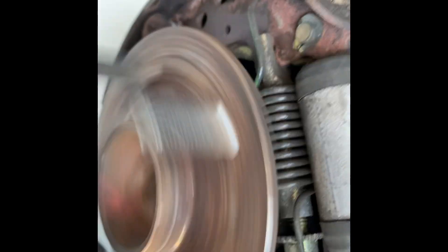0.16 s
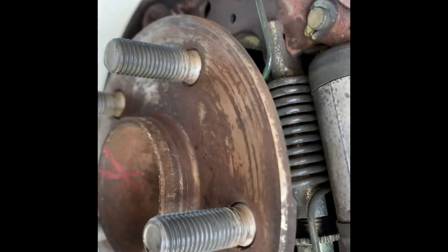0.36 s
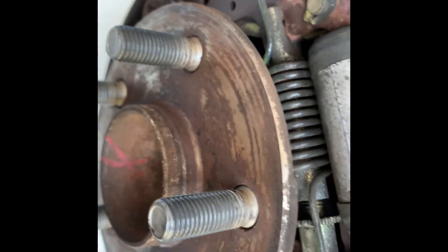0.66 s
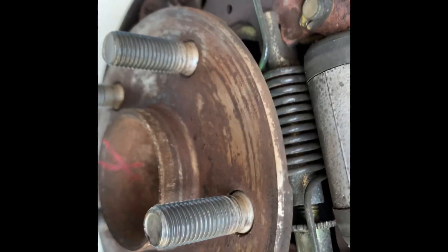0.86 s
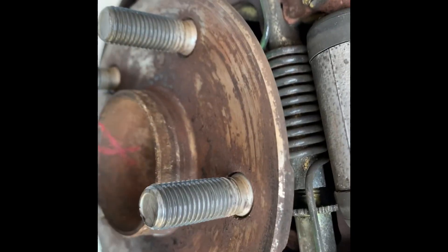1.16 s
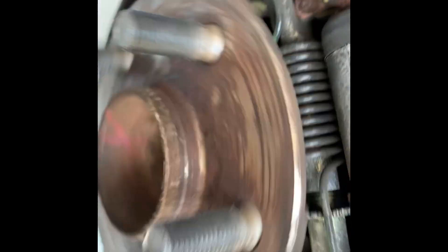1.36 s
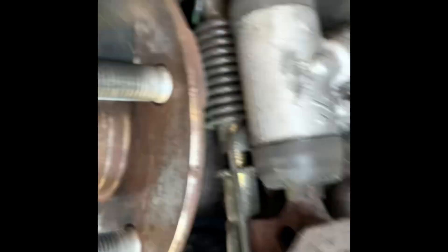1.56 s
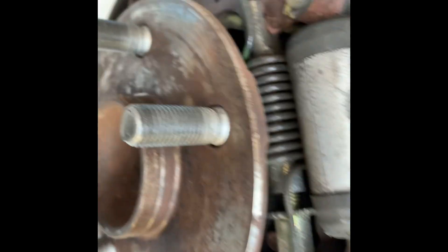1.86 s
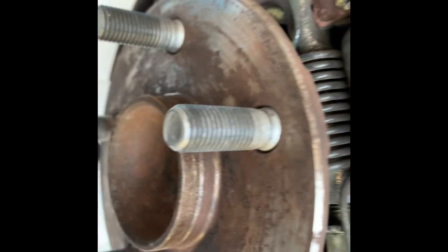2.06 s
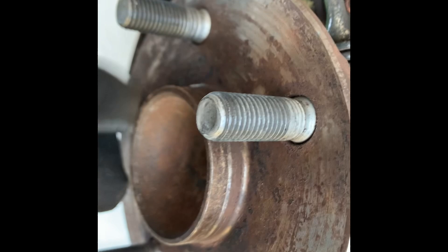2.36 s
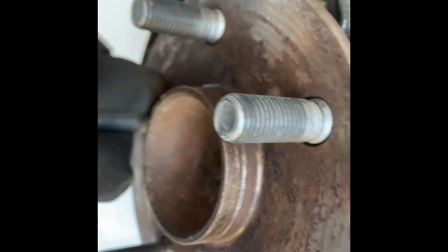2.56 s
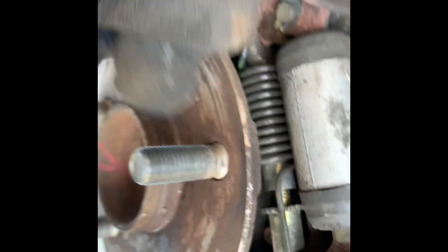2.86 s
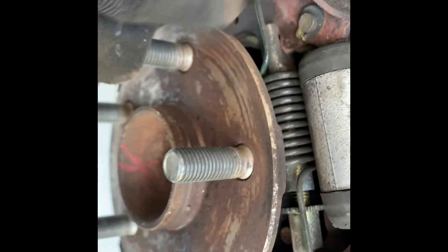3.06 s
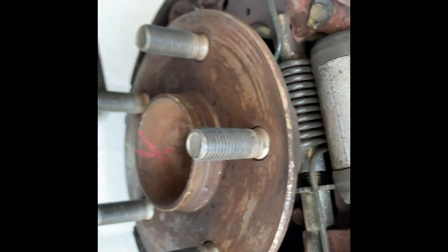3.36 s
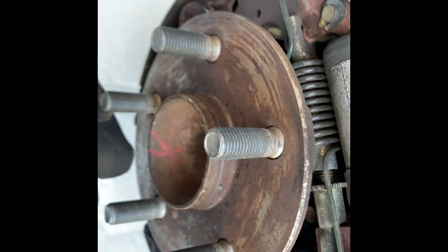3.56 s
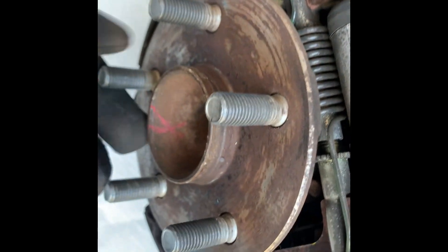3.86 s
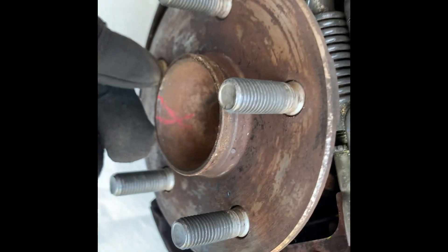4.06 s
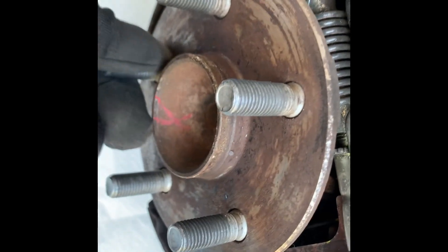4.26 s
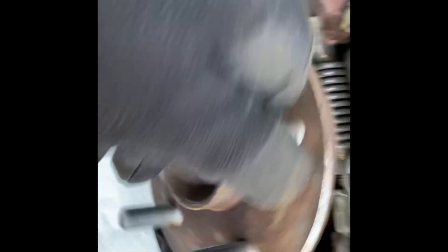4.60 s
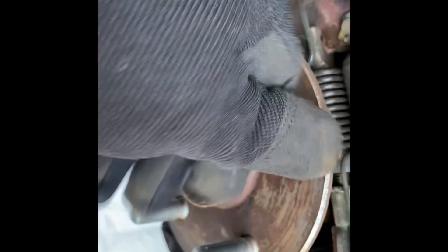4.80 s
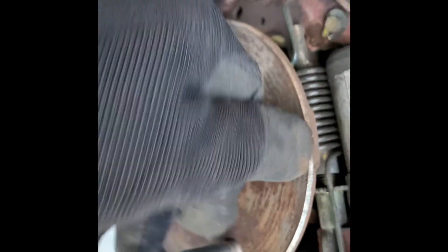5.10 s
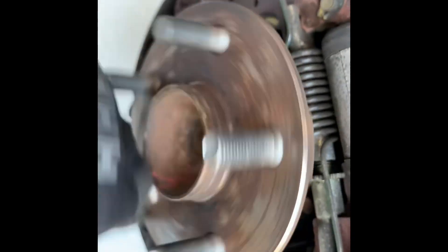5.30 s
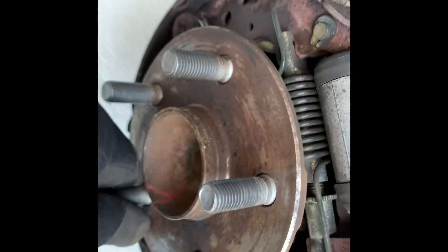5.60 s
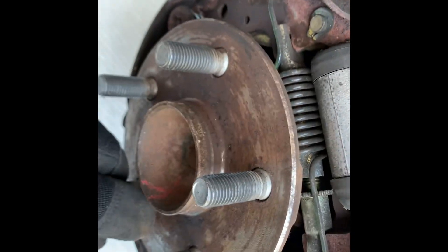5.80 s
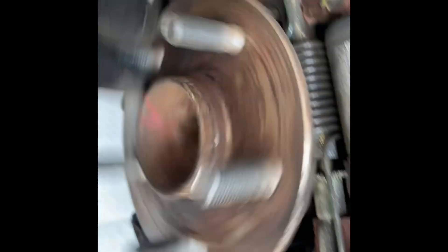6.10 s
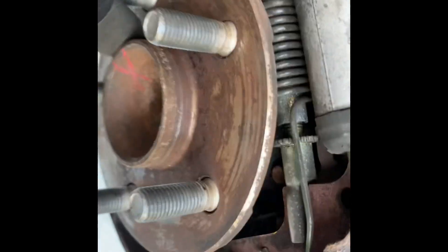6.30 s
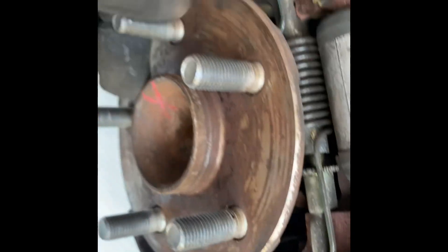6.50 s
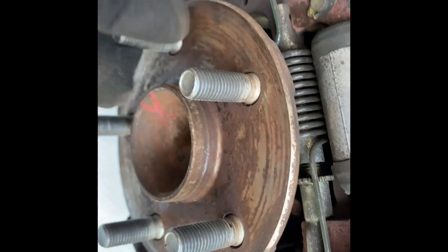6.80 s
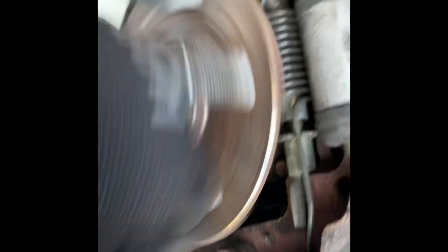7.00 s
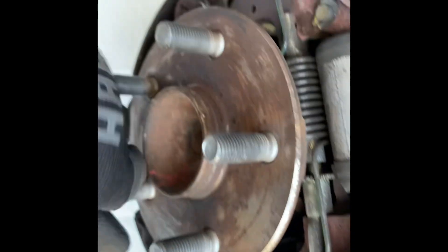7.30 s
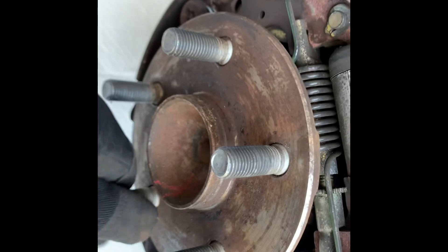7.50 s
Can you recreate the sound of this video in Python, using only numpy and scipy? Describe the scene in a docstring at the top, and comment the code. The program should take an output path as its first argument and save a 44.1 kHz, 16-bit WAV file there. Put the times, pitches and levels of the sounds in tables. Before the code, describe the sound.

Outdoors, distant traffic makes a low rumble that fades slightly across the whole stretch, while two far engines drone, swelling and dipping. Close to the microphone, a gloved hand flicks a rusty car wheel hub six times, at about 0.1, 1.4, 2.7, 4.5, 5.2 and 7 seconds. Each flick gives a very short, gritty metallic grating from the dry bearing and the hub's rim. Around the flicks the glove rustles and fingertips tick sharply on the metal studs, which ring faintly; the clearest ticks fall near 0.2, 1.4, 5.2, 6.1 and 7 seconds. In the background a bird gives short, hoarse, high chirps roughly once a second, from 0.4 to about 6.5 seconds. From about 4.2 to 6 seconds another bird sings nine quick, evenly spaced falling whistles. After the last flick, a faint glove rustle and the traffic remain.

```python
"""Outdoors, far traffic rumbles from the start and slowly fades, while two engines drone.
Almost at once, close by, a glove rustles, fingertips tick on metal studs, and the hand gives a rusty
wheel hub the first of six flicks. Each time, rust in the dry bearing makes the hub and its flange
(the flat rim) grate. Soon a bird starts to chirp now and then, with two voices at once. From about
4 to 6 seconds another bird sings nine falling whistles. The last flick comes at 7 seconds."""
import sys
import numpy as np
from scipy import signal
from scipy.fft import rfft, irfft, next_fast_len
from scipy.io import wavfile
from scipy.ndimage import uniform_filter1d

SR = 44100
rng = np.random.default_rng(int(sys.argv[2]) if len(sys.argv) > 2 else 0)


def generate_wav(signal):
    """Clip the signal to [-1, 1] and save it as 16-bit WAV at the path in sys.argv[1]."""
    frames = np.transpose(np.atleast_2d(signal))
    scaled = np.clip(frames, -1, 1) * 32767
    pcm = np.round(scaled).astype(np.int16)
    wavfile.write(sys.argv[1], SR, pcm)


N = 337365
PADDED = next_fast_len(N)
T = np.arange(N) / SR
HZ = np.fft.rfftfreq(PADDED, 1 / SR)
TREBLE = 1 / (1 + (9500 / (HZ + 1)) ** 8)  # a filter that keeps what lies above 9500 Hz

# Traffic moving away. Each row: time in seconds, level of the rumble in dB.
RUMBLE_LEVELS = [(0, -32), (2.6, -34), (2.9, -35), (7.65, -37.5)]
# The tone of the rumble and of the tyre roar. Each row: frequency in Hz, strength in dB.
RUMBLE_TONE = [(12, -57), (20, -34), (30, -21.5), (69, 0.5), (86, -1), (108, -6), (143, -6.5), (163, -8.5),
               (209, -11.5), (340, -35.5), (440, -80), (750, -120)]
ROAR_TONE = [(330, -4.5), (430, 1.5), (700, -5.5), (1000, -4.5), (1700, -9), (2400, -15), (3500, -26),
             (5000, -33.5), (7000, -48.5), (15500, -50.5)]
# How the two far engines swell and fade. Each row: time in seconds, level in dB.
LOW_ENGINE_LEVELS = [(0, -34), (0.45, -29), (1.3, -40.5), (2.15, -41.5), (2.32, -32.5), (3.2, -38),
                     (3.5, -48.5), (4.9, -53), (5.09, -36), (5.25, -52.5), (7.65, -42)]
HIGH_ENGINE_LEVELS = [(0, -42), (1.85, -42), (2.0, -32.5), (2.5, -45.5), (3.3, -40.5), (4.2, -37.5),
                      (5.1, -49.5), (5.55, -37.5), (5.75, -74), (5.9, -46.5), (6.9, -45.5), (7.1, -41.5),
                      (7.65, -37.5)]
# The glove sliding on rust and on itself. Each row: middle in seconds, length in seconds, level in dB,
# boost above 9500 Hz in dB. Here and below, a negative boost is a cut.
GLOVE_STROKES = [(0.142, 0.13, -51, 2.5), (0.48, 0.25, -67.5, 1), (1.083, 0.12, -52, -4),
                 (1.229, 0.077, -59.5, -7), (1.376, 0.19, -58, 2), (1.494, 0.089, -50.5, 9),
                 (1.582, 0.086, -57, 9.5), (1.66, 0.082, -57.5, 1), (1.96, 0.087, -67, -10),
                 (2.075, 0.061, -59, -1), (2.33, 0.067, -68.5, 5), (2.49, 0.1, -71, -8),
                 (2.71, 0.06, -50, 7), (2.785, 0.09, -55.5, 9), (2.93, 0.13, -62, 2.5),
                 (3.14, 0.068, -71, -2), (3.33, 0.17, -65, 0.5), (3.623, 0.42, -78, -4),
                 (3.96, 0.78, -74, -9), (4.162, 0.093, -70, -8), (4.514, 0.25, -67, -15),
                 (4.798, 0.09, -72, -1), (5.102, 0.089, -64.5, -3.5), (5.258, 0.15, -57.5, 1.5),
                 (5.714, 0.077, -59, -14), (6.258, 0.063, -74, -5), (6.042, 0.32, -64, -18),
                 (6.366, 0.085, -59, 4), (6.84, 0.098, -72, 7), (7.003, 0.18, -59.5, 3),
                 (7.242, 0.094, -69, -7), (7.625, 0.16, -64.5, -12)]
# The tone of the cloth. Each row: frequency in Hz, strength in dB.
CLOTH_TONE = [(1500, -6), (3000, 13.5), (5000, 11.5), (7500, -3.5), (10000, -10), (13000, -17),
              (15500, -12.5)]
# Fingertips meeting a stud or the flange. Each row: start in seconds, level in dB, boost below 4000 Hz
# in dB, boost above 9500 Hz in dB, ringing in dB compared with the level.
FINGER_TICKS = [(0.088, -38, -1, -6, -33), (0.165, -28, -11, -16, -43), (0.1999, -29, 0.5, -4, -23),
                (0.461, -50, -3, -10, -40), (0.934, -61, 0, 8, -38), (.9916, -60, -3, 6, -13),
                (1.2037, -54, 0, 12, -25), (1.3144, -51, 3, 0, -34), (1.415, -25, -11, 3, -47),
                (1.675, -44, -6, -6, -37), (1.9215, -66, 0, -3, 0), (1.994, -58, 0, 4, -37),
                (2.036, -64.5, 0, -3, -2.5), (2.0616, -46, 7, 13, -41), (2.574, -45.5, 4, 12, -38),
                (2.6209, -46, 0, -10, -30), (2.82, -54, 0, -5, -10), (2.8998, -43, -3, 2, -22),
                (3.148, -45, 14.5, 8, -23.5), (3.955, -51.5, 0, -1, -33), (4.403, -45.5, 0, 11.5, -44),
                (4.541, -43, -5, -27, -42), (5.1945, -31, -13, -16, -25), (5.244, -29, -15, -5, -41),
                (5.968, -49.5, 0, 6, -37), (6.0602, -32.5, -8, -9, -43), (6.136, -30, -0.5, -26, -49),
                (6.6, -51.5, 0, 2, -32), (6.825, -52, 0, 16.5, -30), (6.9037, -43, -1, -18, -37),
                (6.9631, -28.5, 1, -2, -37), (7.013, -27, -28, -10, -36)]
# The notes a stud rings with. Each row: pitch in Hz, level in dB, seconds to fade by 60 dB.
STUD_NOTES = [(6486, 3.5, 0.36), (3390, 0, 0.3), (7700, 1, 0.22), (11090, -12, 0.12)]
# The notes the hub and flange ring with. Each row: pitch in Hz, width in Hz, level in dB.
HUB_NOTES = [(312, 10, -1), (504, 85, -4), (610, 65, -1), (787, 80, -2), (967, 30, 6.5), (1090, 85, -4),
             (1240, 65, -2.5), (1392, 75, -2), (1530, 100, -3), (1715, 80, -6), (2510, 80, -5),
             (2920, 65, -3.5), (3410, 95, -4.5), (3920, 120, -6.5), (4800, 220, -12), (5660, 50, -14),
             (6520, 80, -11), (6770, 60, -12), (7400, 170, -11), (8050, 70, -14), (9660, 94, -22),
             (10900, 80, -25)]
# Flicks of the hub. Each row: middle in seconds, length in seconds, level in dB, boost above 2000 Hz in
# dB, boost below 800 Hz in dB, delay of that low part in seconds, boost of the flange note in dB.
FLICKS = [(0.147, 0.12, -38.5, -1, 4, 0.0059, 2), (1.445, 0.11, -38, -4, 6.5, 0.035, -5.5),
          (2.688, 0.12, -36.5, -2.5, 0.5, 0.0088, -2), (4.518, 0.091, -37.5, -6.5, -1, .005, -1),
          (5.231, 0.11, -37, -5.5, 0, .005, 3), (6.991, 0.13, -34, -6, 1.5, 0.0042, -3)]
# The first bird's chirps. Each row: start in seconds, length in seconds, top pitch in Hz, lower voice's
# pitch as a share of the upper's, level in dB, boost of the lower voice in dB, level of the rasp in dB.
BIRD_CHIRPS = [(0.384, 0.074, 4100, 0.81, -44.5, -6, -62), (1.266, 0.058, 4060, 0.85, -41.5, -10, -61),
               (2.191, 0.076, 3950, 0.85, -48, -6, -64), (2.947, 0.056, 4050, 0.86, -49, -2.5, -60),
               (3.818, 0.056, 4150, 0.94, -43.5, 3, -58.5), (4.653, 0.049, 4020, .87, -43, -2, -66),
               (5.745, 0.056, 3880, 0.88, -42.5, -6, -58), (6.4, 0.078, 3900, 0.91, -42.5, -4.5, -58.5)]
# The course of one chirp. Each row: share of its length, share of its top pitch, boost of the upper
# voice in dB, boost of the lower voice in dB.
CHIRP_SHAPE = [(0, .83, -11, -18), (.2, .93, -4, -7), (.4, 1, 0, -1), (.66, .975, -1, 0),
               (.83, .94, -6, -2), (1, .89, -20, -10)]
# The second bird's whistles. Each row: time of the rough middle in seconds, level in dB.
BIRD_WHISTLES = [(4.25, -43), (4.463, -40.5), (4.676, -39), (4.887, -39), (5.097, -38.5), (5.299, -37),
                 (5.505, -38), (5.711, -39), (5.911, -38.5)]
# How alike the two microphones hear a sound. Each row: frequency in Hz, likeness from 0 to 1.
STEREO_LIKENESS = [(60, 1), (250, 0.89), (400, 0.7), (700, 0.072), (1600, 0.47), (2600, 1), (3700, 0.16),
                   (4500, 1), (16000, 1)]
# How much louder the left microphone is. Each row: frequency in Hz, left minus right in dB.
LEFT_LEAN = [(60, 2.6), (200, 4), (430, 5.8), (800, 2), (1300, .3), (16000, 0)]
# How far the wave on the right runs ahead. Each row: frequency in Hz, lead in radians.
RIGHT_LEAD = [(0, 0), (250, 0), (750, 1.3), (1800, 0), (2600, -1.6), (3600, -1.8), (4650, -np.pi)]


def undb(db):
    """Turn decibels into a number to multiply by."""
    return 10 ** (np.asarray(db) / 20)


def unit(x):
    """Scale a sound to an average power of 1."""
    return x / np.sqrt(np.mean(x ** 2))


def on_log_hz(table):
    """Join rows of (Hz, value) into a curve over all frequencies, giving each octave equal room."""
    hz, value = np.transpose(table)
    return np.interp(np.log(HZ + 1), np.log(hz), value)


def colour(x, gain):
    """Filter a sound: multiply each frequency by its own gain."""
    return irfft(rfft(x, PADDED) * gain, PADDED)[:N]


def walk(per_s):
    """A smooth random wobble of about 1 either way, with per_s new values a second."""
    hold = int(SR / per_s)
    steps = np.repeat(rng.standard_normal(N // hold + 1), hold)
    return 1.32 * uniform_filter1d(uniform_filter1d(steps, hold), hold)[:N]


def patchy(x, depth_db, per_s):
    """Make each octave of a sound flicker in level on its own."""
    octave = np.log2(HZ + 1)
    bands = (colour(x, np.clip(1 - np.abs(octave - k), 0, 1)) for k in range(8, 15))
    return sum(band * undb(depth_db * walk(per_s)) for band in bands)


def grit(per_s, spread_db):
    """Random clicks, most of them small and a few large."""
    hit = rng.random(N) < per_s / SR
    return unit(hit * rng.standard_normal(N) * undb(spread_db * rng.exponential(size=N)))


def bump(mid, length, edge):
    """A swell up to 1 and back; a larger edge makes it squarer."""
    return np.exp(-np.abs((T - mid) / (length / 2)) ** edge)


def spread(x, other):
    """Make stereo: the left side hears x, the right side a blend of x and other."""
    alike = np.clip(on_log_hz(STEREO_LIKENESS), 0, 1)
    return np.array([x, colour(x, alike) + colour(other, np.sqrt(1 - alike ** 2))])


def traffic(roar_db=-43, roar_fade_db_per_s=0.2067):
    """Deep rumble and tyre roar, both fading slowly as the traffic moves away."""
    times, rumble_db = np.transpose(RUMBLE_LEVELS)
    rumble_gain = undb(np.interp(T, times, rumble_db))
    roar_gain = undb(roar_db - roar_fade_db_per_s * T)
    bass = 1 / (1 + (HZ / 340) ** 8)
    pair = []
    for _ in range(2):
        rumble = colour(rng.standard_normal(N), undb(on_log_hz(RUMBLE_TONE)) * bass)
        roar = colour(rng.standard_normal(N), undb(on_log_hz(ROAR_TONE)) * (1 - bass))
        roar = patchy(roar, depth_db=1.6, per_s=4)
        pair.append(unit(rumble) * rumble_gain + unit(roar) * roar_gain)
    return spread(*pair)


def drone(hz, levels, waver_hz):
    """An engine's firing makes a tone, which wavers in pitch and level on its long way here."""
    times, db = np.transpose(levels)
    phase = 2 * np.pi * np.cumsum(hz + waver_hz * walk(9)) / SR
    return np.sqrt(2) * undb(np.interp(T, times, db) + 2 * walk(12)) * np.sin(phase)


def engines():
    """One engine sags slowly in pitch; the other slows for 2.1 seconds and then holds."""
    low_hz = 85.4 - 0.4 * T
    high_hz = np.interp(T, [0, 2.1], [147.26, 134.8])
    low = drone(low_hz, LOW_ENGINE_LEVELS, waver_hz=1.527)
    return low + drone(high_hz, HIGH_ENGINE_LEVELS, waver_hz=0.97)


def glove():
    """Fibres catch and slip in a mass of fine clicks; each stroke has its own brightness."""
    fibres = grit(per_s=5000, spread_db=2.1) * undb(2 * walk(14))
    fibres = patchy(fibres, depth_db=2.2, per_s=18)
    cloth = undb(on_log_hz(CLOTH_TONE)) * (HZ / (HZ + 1500)) ** 2
    low = unit(colour(fibres, cloth * (1 - TREBLE)))
    high = unit(colour(fibres, cloth * TREBLE))
    rustle = (low + high) * undb(-80 + 3.5 * walk(11))  # small restless movements of the hand
    for mid, length, db, high_db in GLOVE_STROKES:
        rustle += undb(db) * bump(mid, length, edge=4.6) * (low + undb(high_db) * high)
    return rustle


def hub_filter():
    """The hub and flange favour their own notes; neighbouring notes swing opposite ways."""
    notes = sum((-1) ** k * undb(db) / (1 + 1j * (HZ - hz) / (width / 2))
                for k, (hz, width, db) in enumerate(HUB_NOTES))
    body = notes + undb(-19.5) * HZ / (HZ + 300) / (1 + HZ / 6000)
    return body / np.sqrt(np.mean(np.abs(body) ** 2))


def ticks():
    """A fingertip meets metal with a short dry crack, then the stud rings faintly."""
    cracks, ringing = np.zeros((3, N + SR)), np.zeros(N + SR)
    t = T[:SR // 2]
    ring = sum(undb(db - 60 * t / fade_s) * np.sin(2 * np.pi * hz * t) for hz, db, fade_s in STUD_NOTES)
    for start, db, low_db, high_db, ring_db in FINGER_TICKS:
        age = t / undb(0.33 * (db + 30))  # lighter touches give shorter cracks
        rise = np.minimum(age / 0.003, 1) ** 2
        fall = np.exp(-age / 0.0045) + 0.15 * np.exp(-age / 0.016)
        crack = rng.standard_normal(len(t)) * rise * fall
        i = int(start * SR)
        cracks[:, i:i + len(t)] += np.outer(undb([db + low_db, db, db + high_db]), crack)
        ringing[i:i + len(t)] += undb(db + ring_db) * ring
    low, middle, high = cracks[:, :N]
    bass_cut = (HZ / 1400) ** 2 / (1 + (HZ / 1400) ** 2)
    body = bass_cut * (1 - TREBLE + undb(-3) * hub_filter())  # part of each blow goes through the flange
    below = 1 / (1 + (HZ / 4000) ** 4)
    knock = colour(low, body * below) + colour(middle, body * (1 - below))
    snap = colour(high, TREBLE / (1 + (HZ / 13000) ** 4))
    return knock + snap + ringing[:N]


def bearing(flange_hz=967, flange_width_hz=70):
    """Rust grains under the rollers shake the hub while it turns, and it rings on a little."""
    grains = grit(per_s=4000, spread_db=1.6) * undb(1.5 * walk(50))
    grains = patchy(grains, depth_db=2.2, per_s=45)
    low = colour(grains, 1 / (1 + (HZ / 800) ** 4))
    high = colour(grains, 1 / (1 + (2000 / (HZ + 1)) ** 2))
    middle = grains - low - high
    flange = colour(grains, np.exp(-((HZ - flange_hz) / flange_width_hz) ** 2))
    shaking = np.zeros(N)
    for mid, length, db, high_db, low_db, delay, flange_db in FLICKS:
        grip = (undb(flange_db) - 1) * flange  # each grip damps the flange note differently
        scrape = bump(mid, length, edge=2.8) * (middle + undb(high_db) * high + grip)
        growl = bump(mid + delay, length, edge=3.5) * undb(low_db) * low
        shaking += undb(db) * (scrape + growl)
    return colour(shaking, hub_filter())


def hoarse_voice(times, hz, db, flutter_db=2.5, pitch_waver=0.008):
    """One voice from a bird's hoarse throat: an unsteady tone gliding through the given points."""
    gain = undb(np.interp(T, times, db, left=-200, right=-200) + flutter_db * walk(220))
    pitch = np.interp(T, times, hz) * (1 + pitch_waver * walk(300))
    return gain * np.sin(2 * np.pi * np.cumsum(pitch) / SR + 2 * np.pi * rng.random())


def chirps(rasp_hz=6000, rasp_rise_hz_per_s=14000):
    """The first bird opens each chirp with a rising rasp and sings two voices that rise and fall."""
    song = np.zeros(N)
    roughness = walk(2800)
    time_share, pitch_share, upper_shape, lower_shape = np.transpose(CHIRP_SHAPE)
    for start, length, top_hz, lower_share, db, lower_db, rasp_db in BIRD_CHIRPS:
        t = T - start
        rasp = roughness * np.sin(2 * np.pi * (rasp_hz + rasp_rise_hz_per_s * t / 2) * t)
        song += undb(rasp_db) * bump(start, length=0.065, edge=3.1) * rasp
        for share, shape_db in ((1, upper_shape), (lower_share, lower_shape + lower_db)):
            levels = db + shape_db + 2 * rng.standard_normal(len(shape_db))
            song += hoarse_voice(start + length * time_share, share * top_hz * pitch_share, levels)
    return song


def whistle(mid, db, mid_hz=2935, slide_hz_per_s=13300, lead_s=0.038, length_s=0.1):
    """The second bird's whistle drops fast from its top pitch, then slides down evenly."""
    t = T - mid + lead_s
    drop_hz = 850 * np.exp(-np.abs(t) / 0.003)
    hz = mid_hz - slide_hz_per_s * (t - lead_s) + drop_hz
    fade = np.clip(np.minimum(t / 0.001, (length_s - t) / 0.045), 0, 1)  # quickly in, slowly out
    swell_db = -2 * np.clip(1 - t / lead_s, 0, 1)
    waver = 1 + 0.0066 * rng.standard_normal() + 0.01 * walk(200)
    phase = 2 * np.pi * np.cumsum(hz * waver * (fade > 0)) / SR
    return fade * undb(db + swell_db) * np.sin(phase)


def birds(bounce_s=0.00242, bounce_db=-4, echo_db=-37, echo_fade_s=0.3):
    """Both songs, with a blur of echoes from walls and trees."""
    whistles = sum(whistle(mid, db) for mid, db in BIRD_WHISTLES)
    # a bounce off a surface near the bird cancels some pitches, breaking each whistle into beads
    bounce = undb(bounce_db) * np.exp(-2j * np.pi * HZ * bounce_s)
    song = colour(whistles, (1 + bounce) / (1 + undb(bounce_db))) + chirps()
    song *= undb(2.2 * walk(130) + 2 * walk(400))  # throat rasp and moving air make the level flutter
    t = T[:SR // 2]
    echoes = rng.standard_normal((2, len(t))) * undb(echo_db - 60 * t / echo_fade_s)
    muffled = colour(song, 1 / (1 + (HZ / 3300) ** 10))  # leaves swallow the higher notes
    return song + signal.fftconvolve(muffled[None], echoes, axes=1)[:, :N]


def scene():
    """The hand and hub close by, with birds, engines and traffic behind them."""
    near = bearing() + glove() + ticks()
    # nearby surfaces send back a short blur of echoes, which makes the two sides differ
    t = T[:SR // 20]
    echoes = rng.standard_normal(len(t)) * np.exp(-t / 0.004)
    blurred = signal.fftconvolve(near, echoes / np.linalg.norm(echoes))[:N]
    return spread(near, blurred) + birds() + engines() + traffic()


def record(dry, right_lag_s=1 / 4275, top_hz=15800):
    """Two microphones: the bass leans left, the treble is late on the right, the very top is cut."""
    hz, lead = np.transpose(RIGHT_LEAD)
    phase = np.interp(HZ, hz, lead) - 2 * np.pi * right_lag_s * np.maximum(HZ - hz[-1], 0)
    lean = undb(on_log_hz(LEFT_LEAN) / 2)
    left = colour(dry[0], lean)
    right = colour(dry[1], np.exp(1j * phase) / lean)
    top_cut = signal.ellip(10, .2, 70, top_hz, fs=SR, output="sos")
    return signal.sosfilt(top_cut, np.array([left, right]))


dry = scene()
out = record(dry)
generate_wav(out)
```